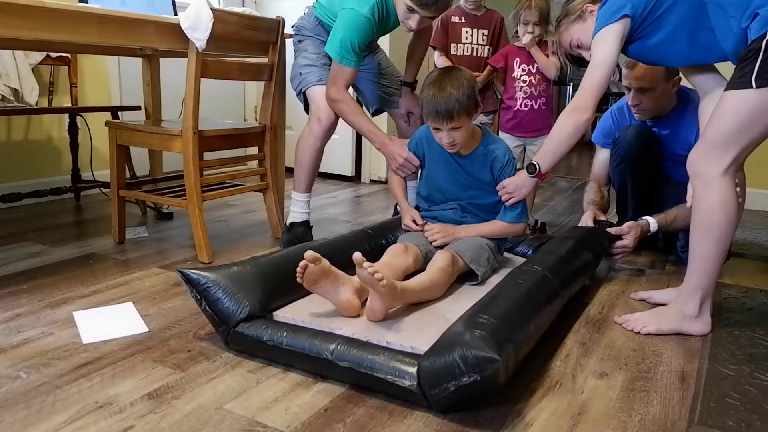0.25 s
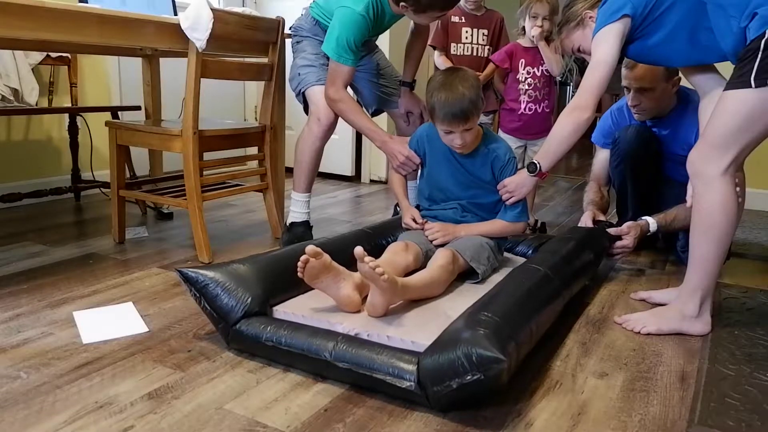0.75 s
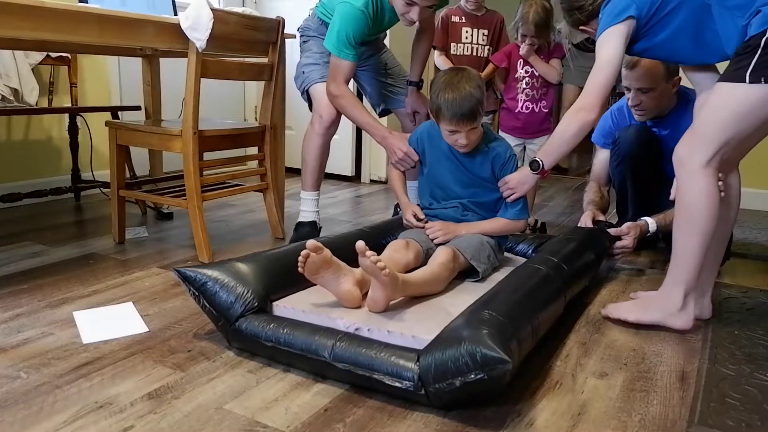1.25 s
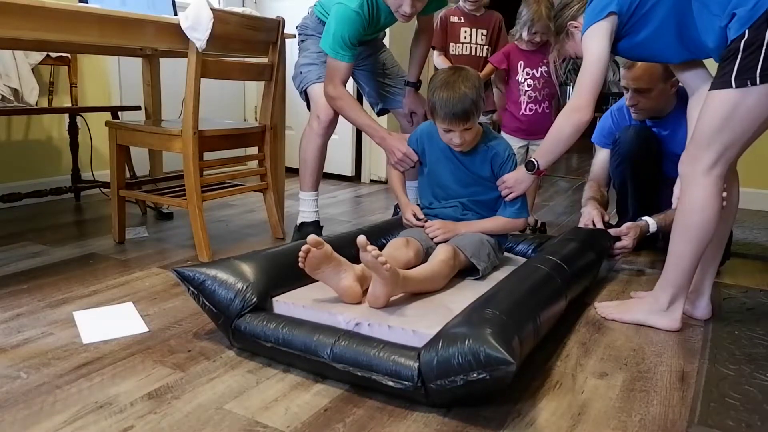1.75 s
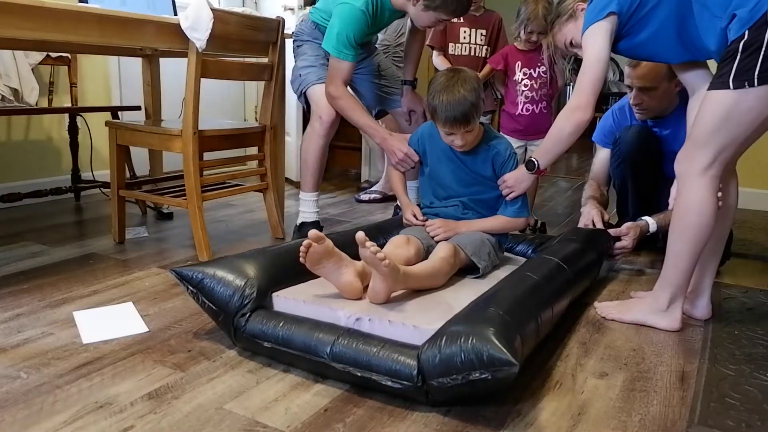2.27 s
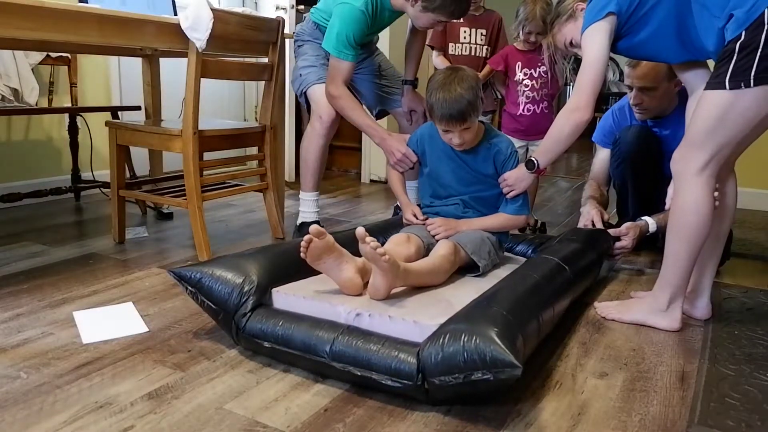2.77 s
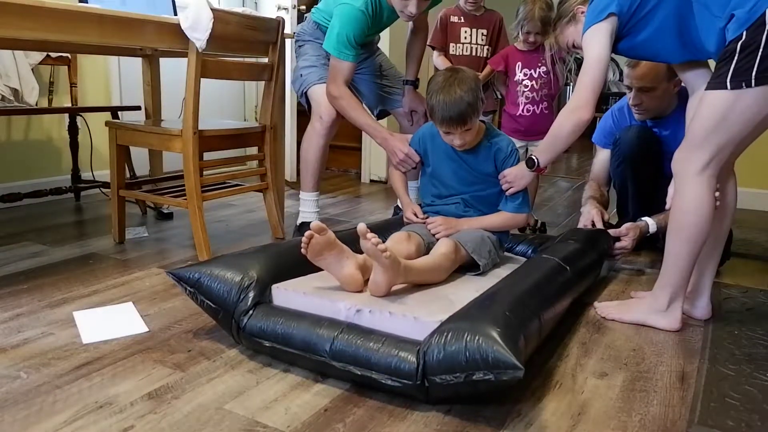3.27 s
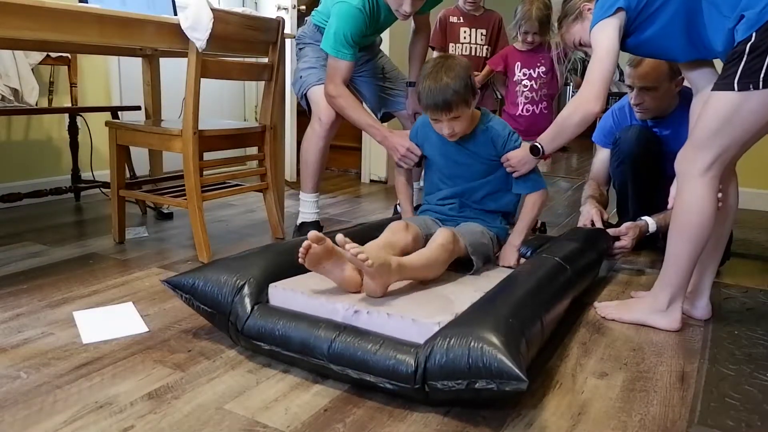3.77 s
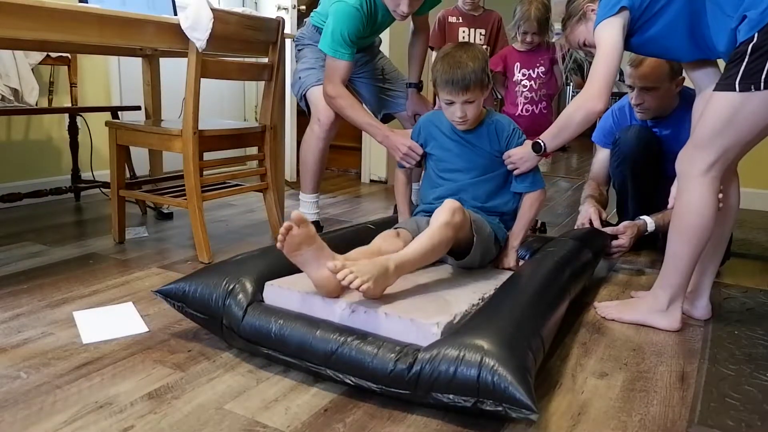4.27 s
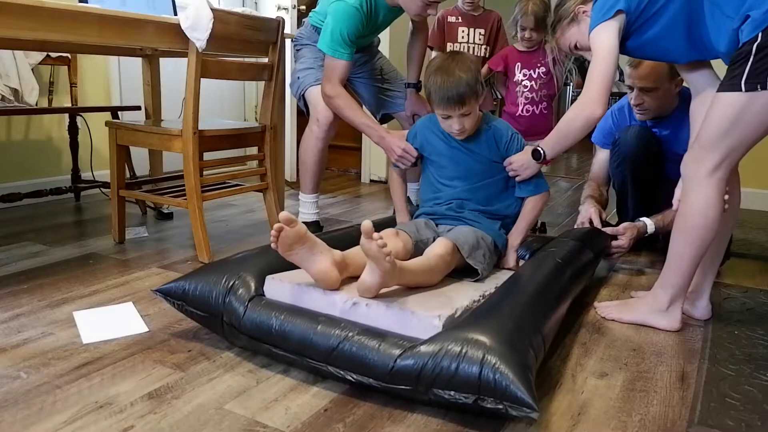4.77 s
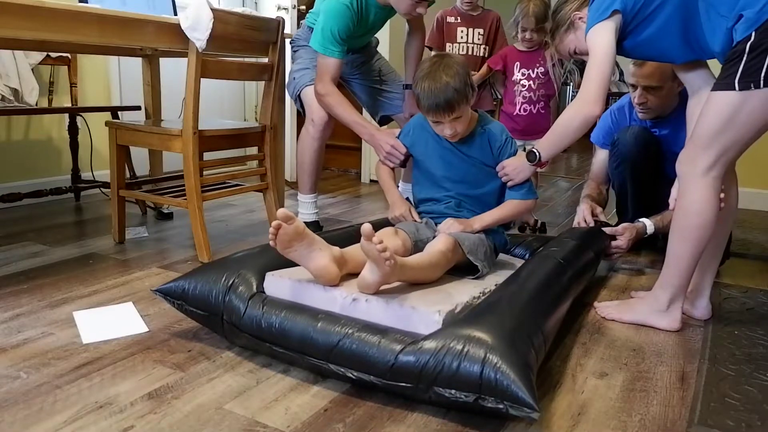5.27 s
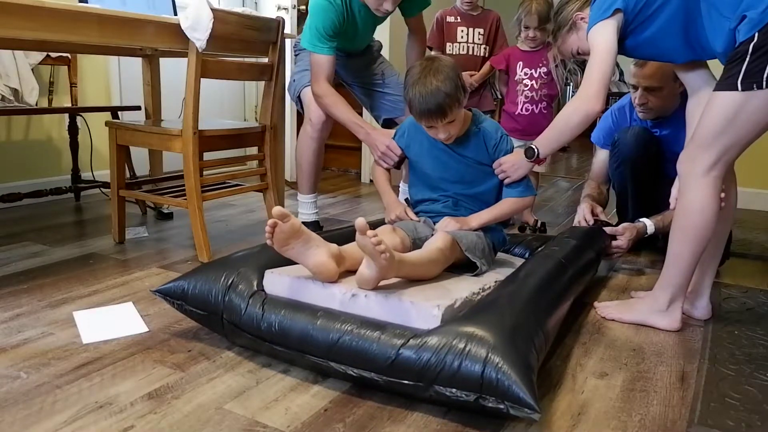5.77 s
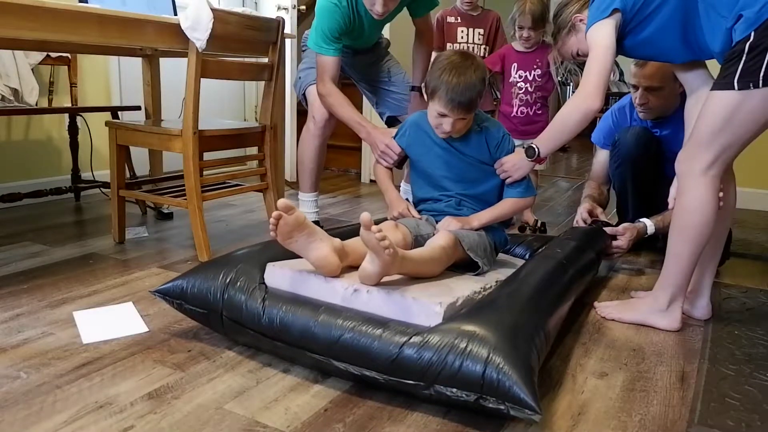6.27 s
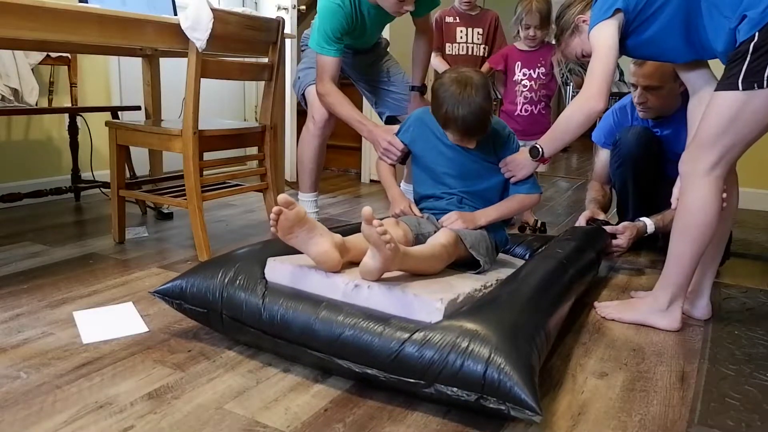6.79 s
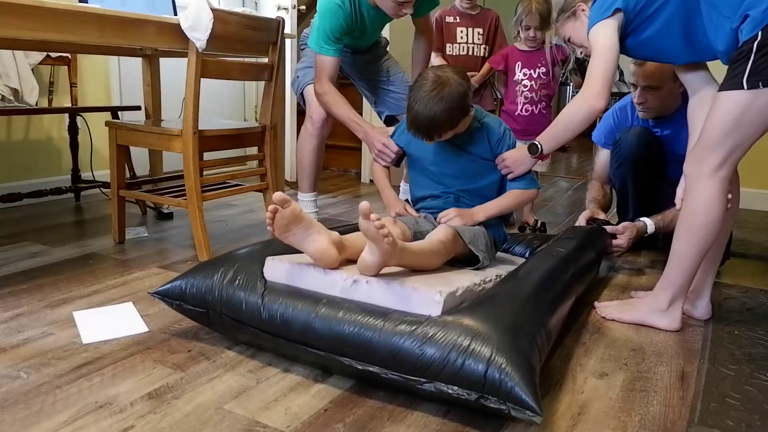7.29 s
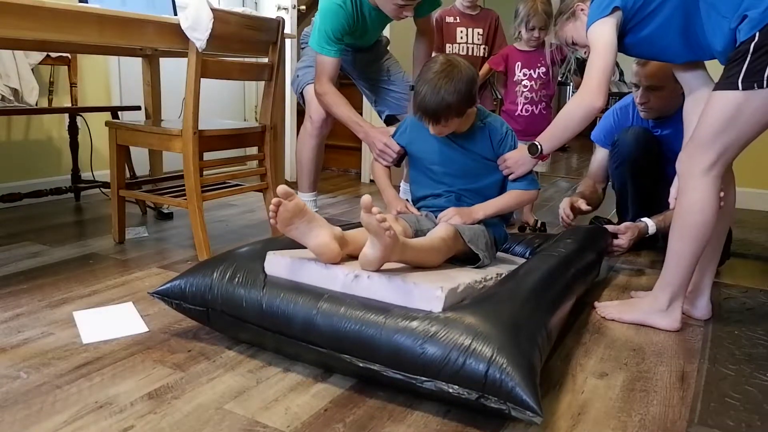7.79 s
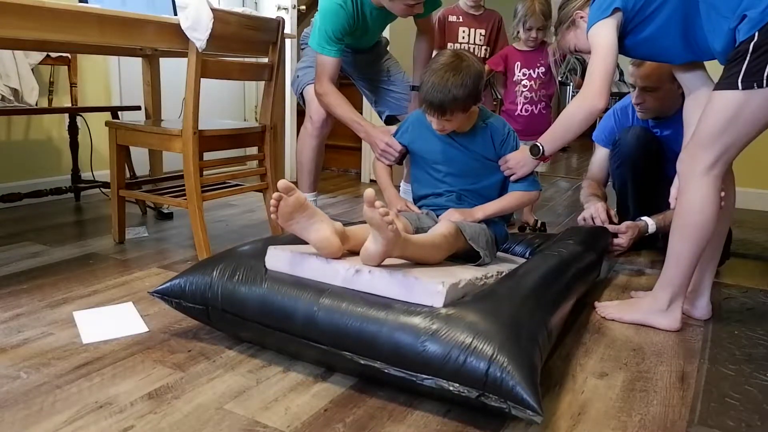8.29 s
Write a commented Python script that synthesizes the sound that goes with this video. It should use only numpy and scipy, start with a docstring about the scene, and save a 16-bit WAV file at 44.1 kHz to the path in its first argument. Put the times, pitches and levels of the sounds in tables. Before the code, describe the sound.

A continuous small-fan motor whines and blows hissing air into a heavy plastic bag indoors. Individual tones swell and fade as the speed slowly rises by nearly two semitones. The plastic rubs lightly, then snaps taut with a brief muffled burst and flutter near the middle, followed later by a lower, softer pop. The motor is still running at the end. Nearby stereo pickup, slight room reverberation, faint hum and hiss.

```python
"""Electric inflator filling a plastic bag

A small electric inflator fills a big plastic bag on the wooden floor of a room.
Back pressure unloads the fan, so its shaft creeps up in speed: its harmonics are summed as cosines
that swell and fade through the resonances of bag and room. Air is shaped noise, rushing through
the housing and past the nozzle. The plastic drums, rustles and pops (noise bursts) as it lifts its load."""
import sys
import numpy as np
from scipy import signal
from scipy.fft import rfft, irfft, next_fast_len
from scipy.io import wavfile
from scipy.ndimage import map_coordinates

SR = 44100
rng = np.random.default_rng(int(sys.argv[2]) if len(sys.argv) > 2 else 0)


def to_wav(s):
    """Save 16-bit WAV."""
    ch = np.atleast_2d(s).T  # columns
    pcm = np.round(np.clip(ch, -1, 1) * 32767)  # PCM
    wavfile.write(sys.argv[1], SR, pcm.astype(np.int16))


N = 376613
TIME = np.arange(N) / SR  # s

# Shaft speed, rising as the bag tightens: (time [s], speed [turns/s])
SHAFT_SPEED = [(0.0, 138.32), (0.9, 139.73), (1.5, 140.18), (2.35, 140.71), (2.8, 141.36), (3.45, 142.1),
               (4.3, 143.43), (4.7, 144.53), (5.2, 146.62), (5.6, 147.64), (6.0, 149.1), (6.65, 150.55),
               (7.4, 151.91), (8.1, 153.08), (8.54, 153.65)]
# Steady whine of the fan, before the room: (frequency [Hz], level of a harmonic lying there [dB rms])
WHINE_LEVEL = [(140, -67), (300, -70), (425, -60.5), (570, -64), (720, -48.5), (880, -54), (1050, -54),
               (1700, -51.5), (2400, -53.5), (3100, -53), (3600, -54), (4700, -55.5), (5800, -63.5),
               (7500, -70.5), (10000, -77)]
# Strong resonances of bag and room:
# (centre [Hz], half width [Hz], level of an ordinary harmonic at the centre, before its waver [dB rms])
RESONANCES = [(419, 4, -55), (753, 8, -42), (862, 12, -47.5), (879, 6, -41), (1405, 4.5, -42),
              (1490, 7, -41), (1600, 7, -43), (1689, 3.5, -42.5), (1712, 4, -45), (1731, 11, -40.5),
              (1783, 10, -36.5), (1834, 13, -47.5), (1948, 8, -45), (2094, 5, -47.5), (2468, 24, -43.5),
              (2933, 8, -45), (3160, 6, -47), (3403, 6, -48), (3490, 16, -49), (3872, 32, -45.5),
              (4455, 20, -49), (4882, 13, -49)]
# Noise colours give the shape only; the loudness is set where each noise is used.
# Air through the fan: (frequency [Hz], relative density [dB per Hz])
DRAUGHT_COLOUR = [(35, -37), (70, -8.5), (140, -5.5), (330, -4.5), (440, -0.5), (590, -6.5), (720, 4.5),
                  (1000, 6), (1450, -2.5), (2300, -2.5), (3000, -7), (5000, -2.5), (6300, -14.5),
                  (12000, -30)]
# Air resonances and notches of housing and nozzle: (centre [Hz], width [Hz], lift [dB])
HOUSING_PEAKS = [(192, 26, 1.5), (343, 14, -7.5), (457, 68, 1), (840, 85, -4), (1079.7, 45.5, 11.5),
                 (1179, 47, 10), (1804, 150, 5), (2056, 90, 5), (2474, 86, 11.5), (2598, 68, 9),
                 (3120, 80, -6.5), (3263, 520, 6.5), (3750, 69, -3), (4384, 79, 7), (9400, 760, 4)]
# Air spilling past the nozzle: (frequency [Hz], relative density [dB per Hz])
SPILL_COLOUR = [(100, -22), (300, -16), (800, -0.5), (1300, -16.5), (1750, -13.5), (2500, 11.5),
                (4500, -19), (7000, -8.5), (10000, -27.5), (13000, -48)]
# Skin of the bag drumming: (frequency [Hz], relative density [dB per Hz])
FLUTTER_COLOUR = [(50, -29), (150, -7.5), (300, -6.5), (550, -2), (850, 3.5), (1300, -8.5), (3000, -41)]
# Brief dip in the body of the stream: (time [s], fall [s], recovery [s], change [dB])
FLOW_DIP = (5.3, .32, .42, -1)
# The bag heaving under its load:
# (time [s], rise [s], fall [s], more spill [dB], more drumming [dB], rubbing [dB])
HEAVES = [(3.65, 0.6, 0.93, 4, 0, -59), (4.7, .33, 0.18, 3, 15, -56)]
# The bag thumping and popping taut:
# (onset [s], envelope peak of equal energy [dB], centre [Hz], width [octaves], time to peak [s])
POPS = [(4.672, -36, 380, .9, .02), (4.684, -28, 1500, 1.2, .0035), (4.686, -23.5, 800, .65, .002),
        (4.703, -28, 650, .9, .003), (6.023, -29, 720, .35, .006), (6.032, -38, 170, .8, .009),
        (6.035, -29, 450, .45, .005), (6.058, -35, 470, .45, .006)]
# Short rubs of plastic: (onset [s], envelope peak [dB], time to peak [s])
RUSTLES = [(3.025, -50, 0.015), (3.22, -52, 0.018), (4.684, -54, 0.018), (6.03, -58, .015)]
# Fizz of rubbed plastic: (frequency [Hz], relative density [dB per Hz])
RUSTLE_COLOUR = [(1000, -18), (3000, -12), (6500, 8), (9500, 3), (12000, -19), (16000, -30)]
# Microphone hiss: (frequency [Hz], relative density [dB per Hz])
HISS_COLOUR = [(100, -15), (5000, -14), (9000, 9), (11500, 0), (16000, 1.5)]
# Difference between the two microphones: (frequency [Hz], gain on the side signal [dB])
SIDE_GAIN = [(60, -13), (150, -9.5), (350, -14.5), (700, -16.5), (1400, -12), (2800, -10.5), (5500, -8),
             (9000, -1), (15000, -0.5)]
# Stereo balance: (frequency [Hz], left minus right [dB])
BALANCE = [(60, -2.5), (200, -.5), (700, 0.5), (1300, -1.5), (2400, -0.6), (4400, -1), (8000, 0.5),
           (15000, 0.5)]

POLES, POLE_DB = 3, 3  # harmonics at multiples of the rotor's pole count sing this much stronger
FLOW_DB, PRESSURE_TILT_DB = -34, 1.5  # air stream; full pressure lifts its hiss over its body
SPILL_SLACK_DB, SPILL_TIGHT_DB = -41.5, -56  # spill dies down as the folds fill; heaves add to it
FLUTTER_DB = -53.5  # drumming between heaves
EDGE_HZ = 15850  # top of the recorder's band


def amp(db):
    """Decibels to gain."""
    return 10 ** (np.asarray(db) / 20)


def unit(x):
    """Scales to rms 1."""
    return x / np.sqrt(np.mean(x ** 2) + 1e-20)


def curve(rows):
    """Draws a table of (time, value) as a value at every sample."""
    return np.interp(TIME, *np.transpose(rows))


def read(points, hz):
    """Reads a table of (frequency, value) on a log-frequency axis."""
    f, value = np.transpose(points)
    return np.interp(np.log(hz + 1), np.log(f + 1), value)


def colour(x, db_at):
    """Filters x by a function that gives dB for each frequency."""
    size = next_fast_len(N + 4096, True)
    gain = amp(db_at(np.fft.rfftfreq(size, 1 / SR)))
    return irfft(rfft(x, size) * gain, size)[..., :N]


def noise(points, peaks=()):
    """Two unrelated noises (mid, side), jointly at rms 1, with a broad colour and resonances on top."""
    def db_at(hz):
        db = read(points, hz)
        for centre, width, lift_db in peaks:
            db = db + lift_db / (1 + (2 * (hz - centre) / width) ** 2)
        return db
    return unit(colour(rng.standard_normal((2, N)), db_at))


def drift(rate):
    """Slow chance of rms 1, changing about rate times a second."""
    knots = rng.standard_normal(4096)
    coarse = map_coordinates(knots, [TIME[::64] * rate], order=3, mode="wrap")
    return unit(coarse).repeat(64)[:N]


def burst(length, t):
    """An envelope that peaks at 1 after the given length and dies away."""
    return t / length * np.exp(1 - t / length)


def swell(s, rise, fall):
    """A smooth hump of height 1 at time s."""
    return np.exp(-((TIME - s) / np.where(TIME < s, rise, fall)) ** 2)


def pressure():
    """Tightness of the bag, 0 slack to 1 full, in step with the rising fan speed."""
    speed = curve(SHAFT_SPEED)
    return (speed - speed.min()) / np.ptp(speed)


def room(x, wet_db, t60):
    """Direct sound plus a decaying tail of sparse reflections; the side signal is reflections only."""
    t = np.arange(SR // 2) / SR
    sparse = (rng.random((2, len(t))) < .05) * (t > .002)
    taps = rng.standard_normal((2, len(t))) * sparse
    tail = taps * amp(-60 * t / t60)
    tail /= np.linalg.norm(tail, axis=1, keepdims=True)
    tail[0] *= amp(wet_db)
    tail[0, 0] = 1  # the direct sound
    tail[0] /= np.linalg.norm(tail[0])
    return signal.fftconvolve(x[None], tail, axes=1)[:, :N]


def background(hum_hz=59.6, hum_db=-63, hiss_db=-62):
    """A low appliance hum, mid and side a quarter cycle apart, and the hiss of the microphones."""
    phases = np.array([[0], [np.pi / 2]])
    hum = np.sqrt(2) * amp(hum_db) * np.sin(2 * np.pi * hum_hz * TIME + phases)
    return hum + amp(hiss_db) * noise(HISS_COLOUR)


def plastic():
    """Folds of the bag snap with dull, damped thuds; rubbing and heaving give swells of fizz."""
    pops, rubbing = np.zeros(N), np.zeros(N)
    t = np.arange(8192) / SR
    hz = np.fft.rfftfreq(len(t), 1 / SR) + 1
    for s, db, centre_hz, octaves, length in POPS:
        band = np.exp(-.5 * (np.log2(hz / centre_hz) / octaves) ** 2)
        shape = burst(length, t)
        thud = shape * irfft(band * rfft(rng.standard_normal(len(t))))
        thud *= np.linalg.norm(shape) / np.linalg.norm(thud)  # same energy as the envelope
        pops[round(s * SR):][:len(t)] += amp(db) * thud
    for s, db, length in RUSTLES:
        rubbing[round(s * SR):][:len(t)] += amp(db) * burst(length, t)
    for s, rise, fall, *_, rub_db in HEAVES:
        rubbing += amp(rub_db) * swell(s, rise, fall)
    thuds = room(pops, wet_db=-5, t60=.25)
    return thuds + rubbing * noise(RUSTLE_COLOUR)


def air_stream(tight, gust_db=0.47, hiss_hz=3600, slack_tilt_db=-1):
    """Turbulence rings the housing; growing pressure tips its balance from body towards hiss."""
    stream = noise(DRAUGHT_COLOUR, HOUSING_PEAKS) * amp(FLOW_DB + gust_db * drift(7))
    body = colour(stream, lambda hz: -20 * np.log10(1 + (hz / hiss_hz) ** 8))
    hiss = stream - body
    tilt = amp(slack_tilt_db + PRESSURE_TILT_DB * tight)
    *dip, dip_db = FLOW_DIP
    return body * amp(dip_db * swell(*dip)) / np.sqrt(tilt) + hiss * tilt


def spill_and_flutter(tight, drum_spread=3.3):
    """Air spills past the nozzle and shakes the skin of the bag; heaves lift both, drumming for longer."""
    spill_db = SPILL_SLACK_DB + (SPILL_TIGHT_DB - SPILL_SLACK_DB) * tight
    flutter_db = FLUTTER_DB
    for s, rise, fall, more_spill_db, more_drum_db, _ in HEAVES:
        spill_db = spill_db + more_spill_db * swell(s, rise, fall)
        flutter_db = flutter_db + more_drum_db * swell(s, drum_spread * rise, drum_spread * fall)
    spill = noise(SPILL_COLOUR) * amp(spill_db)
    flutter = noise(FLUTTER_COLOUR) * amp(flutter_db + 1.5 * drift(40))
    return spill + flutter


def shaft(wobble=0.00031):
    """Angle of the motor shaft [rad]: speed summed over time, with a slight unsteadiness (rms fraction)."""
    return 2 * np.pi * np.cumsum(curve(SHAFT_SPEED) * (1 + wobble * drift(14))) / SR


def singing(angle, waver_db=1.93, waver_per_s=6):
    """Each harmonic sings out, wavering a little, while the rising speed carries it across a resonance."""
    speed, out = curve(SHAFT_SPEED), np.zeros((2, N))
    starts = rng.uniform(0, 2 * np.pi, (64, 2, 1))
    for hz, half_width, db in RESONANCES:
        waver = waver_db * drift(waver_per_s)
        # only harmonics that can come close to this resonance
        for k in range(int(hz / speed.max()), int(hz / speed.min()) + 2):
            detune = (k * speed - hz) / half_width
            near = abs(detune) < 4
            pole_db = POLE_DB * (k % POLES == 0)
            gain = amp(db + waver[near] + pole_db) * np.exp(-.5 * detune[near] ** 2)
            out[:, near] += np.sqrt(2) * gain * np.cos(k * angle[near] + starts[k])
    return out


def whine(angle, count=68, wet_db=4, t60=0.55, direct_hz=1100):
    """Harmonics of the shaft; reflections make the high ones fade in and out as the speed creeps up."""
    mean_hz = np.mean(curve(SHAFT_SPEED))
    turn = (angle % (2 * np.pi)).astype(np.float32)
    starts = rng.uniform(0, 2 * np.pi, count)
    stack = 0
    for k, start in enumerate(starts, 1):
        level = amp(read(WHINE_LEVEL, k * mean_hz))
        stack = stack + level * np.cos(k * turn + np.float32(start))
    stack = np.sqrt(2) * stack
    # the low part arrives mostly direct, the high part mostly as reflections
    low = colour(stack, lambda hz: -10 * np.log10(1 + (hz / direct_hz) ** 12))
    return room(low, wet_db=-16.5, t60=t60) + room(stack - low, wet_db, t60)


def scene():
    """All sources as mid and side, turned into two microphones that agree less towards the treble."""
    tight, angle = pressure(), shaft()
    air = air_stream(tight) + spill_and_flutter(tight)
    mid, side = background() + plastic() + air + singing(angle) + whine(angle)
    side = colour(side, lambda hz: read(SIDE_GAIN, hz))
    left = colour(mid + side, lambda hz: read(BALANCE, hz) / 2)
    right = colour(mid - side, lambda hz: -read(BALANCE, hz) / 2)
    return np.array([left, right])


def record(dry):
    """The band limit of the recorder: a steep linear-phase low-pass."""
    lowpass = signal.firwin(511, EDGE_HZ, window=("kaiser", 9), fs=SR)
    return signal.oaconvolve(dry, lowpass[None], "same")


dry = scene()
out = record(dry)
to_wav(out)
```